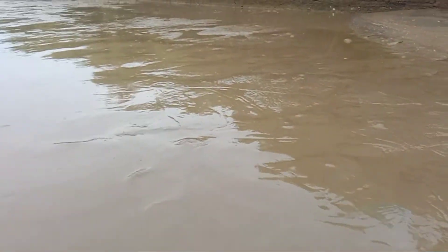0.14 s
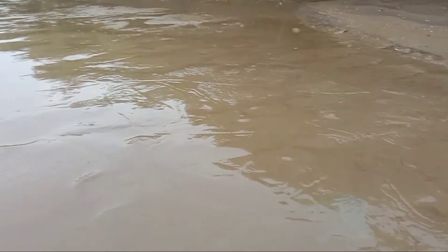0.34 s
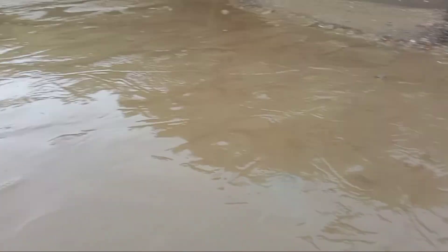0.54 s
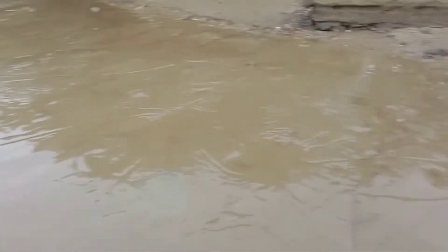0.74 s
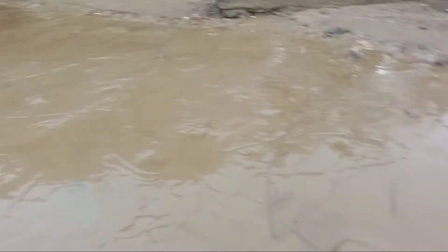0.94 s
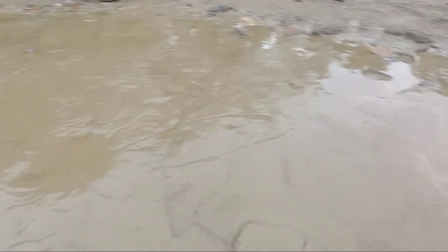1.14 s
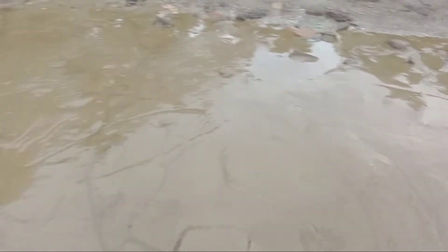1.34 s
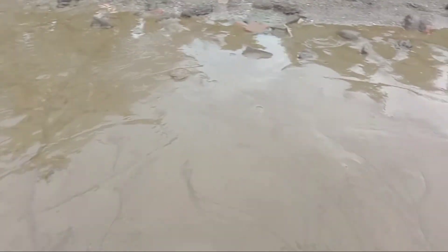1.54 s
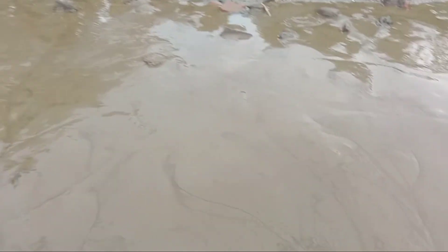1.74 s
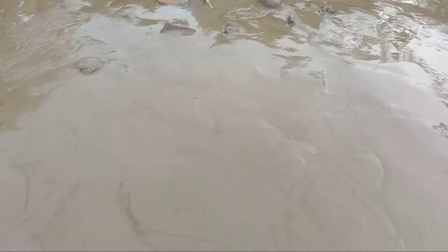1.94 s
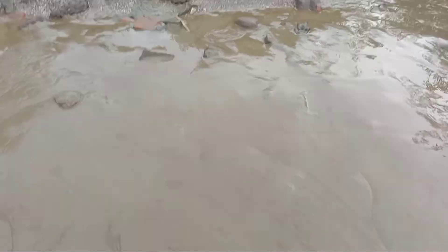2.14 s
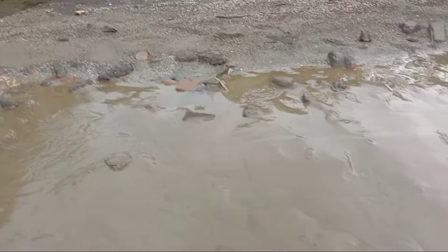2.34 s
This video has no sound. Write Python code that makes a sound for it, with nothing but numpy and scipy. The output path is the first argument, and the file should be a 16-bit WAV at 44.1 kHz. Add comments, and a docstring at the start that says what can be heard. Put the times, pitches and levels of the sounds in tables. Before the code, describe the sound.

A foot squelches and splashes through shallow muddy water while low wind thumps the microphone

```python
"""Wind buffets the microphone while a foot wades through shallow water on tidal mud.
The stride churns up a cloud of ringing bubbles and a fine ticking spray, and drops plop back.
The foot presses into the mud: sliding tones gurgle and short noise cracks snap. Ripples chirp softly.
The wind is low filtered noise with short thumps. Faint tones and soft air noise lie behind it all."""
import sys
import numpy as np
from scipy import signal
from scipy.fft import rfft, irfft
from scipy.io import wavfile

SR = 44100
rng = np.random.default_rng(int(sys.argv[2]) if len(sys.argv) > 2 else 0)


def wav_out(sig):
    """Save sig, one row per channel (or a flat mono array), as 16-bit PCM at SR to the path in sys.argv[1]."""
    wavfile.write(sys.argv[1], SR, np.round(np.clip(np.atleast_2d(sig).T, -1, 1) * 32767).astype(np.int16))


N = 110250  # samples, 2.5 s


def amp(db):
    """Turns decibels into gain."""
    return 10 ** (np.asarray(db) / 20)


def unit(x):
    """Scales a sound to an rms of one."""
    return x / np.sqrt(np.mean(x ** 2) + 1e-20)


def curve(points):
    """Joins (t, value) points with straight lines, one value per sample."""
    return np.interp(np.arange(N) / SR, *np.transpose(points))


def read(points, hz):
    """Reads a spectrum in dB at any frequency, along a log-frequency axis."""
    f, db = np.transpose(points)
    return np.interp(np.log(hz + 1), np.log(f + 1), db)


def colour(x, points):
    """Filters a sound to a spectrum, with no sound before its cause (minimum phase)."""
    size = 4096
    log_gain = np.log(amp(read(points, abs(np.fft.fftfreq(size, 1 / SR)))))
    response = np.exp(np.conj(signal.hilbert(log_gain)))
    taps = np.fft.ifft(response).real
    return signal.fftconvolve(x, taps[:size // 2])[:len(x)]


def noise(points):
    """Makes steady noise with the given spectrum and an rms of one."""
    gain = amp(read(points, np.fft.rfftfreq(N, 1 / SR)))
    return unit(irfft(rfft(rng.standard_normal(N)) * gain, N))


def steadied(x, span_s):
    """Holds the short-term level of a random texture close to one."""
    window = np.hanning(int(2 * span_s * SR) + 3)
    power = signal.fftconvolve(x ** 2, window / window.sum(), "same")
    return x / np.sqrt(abs(power) + 1e-9)


def impacts(per_s, spread_db):
    """Scatters random clicks, a few much larger than the rest."""
    out = np.zeros(N)
    at = np.flatnonzero(rng.random(N) < per_s / SR)
    size, sign = rng.random((N // 4, 2))[:len(at)].T
    boost_db = spread_db * np.minimum(-np.log(1 - size), 4)
    out[at] = amp(boost_db) * np.sign(sign - .5)
    return out


def add(mix, s, sound):
    """Mixes a sound in at a time in seconds."""
    at = round(s * SR)
    part = mix[max(at, 0):][:len(sound)]
    part += sound[:len(part)]


GLIDE_SCALE = .022  # scales each pitch's random glide


def bubble_crowd(level, spectrum, per_s, spread_db, cycles, hiss_db):
    """Many small bubbles each ring briefly and mostly rise a little in pitch, over some hiss."""
    out, t = np.zeros(N), np.arange(SR // 20) / SR
    pitches = np.geomspace(500, 8500, 36)  # Hz
    for hz in pitches:
        age = t * hz / (cycles * rng.uniform(1.0, 2.0))  # the ring fades over 1-2 times `cycles`
        glide = GLIDE_SCALE * rng.uniform(-1.4, 2.96) * np.tanh(age / 2) * 2
        pitch = hz * (1 + glide)
        ring = (1 - np.exp(-6 * age)) * np.exp(-age) * np.sin(2 * np.pi * np.cumsum(pitch) / SR)
        rings = signal.oaconvolve(impacts(per_s / len(pitches), spread_db), unit(ring))[:N]
        out += rings * amp(read(spectrum, hz)) * np.sqrt(hz)  # wider-spaced pitches cover more Hz
    texture = unit(out) + amp(hiss_db) * noise(spectrum)
    return steadied(texture, 0.031) * amp(curve(level))


# how loud the churned water is over time: t/s, level/dB
CHURN_LEVEL = [(0, -78), (.3, -70.5), (.62, -70), (.665, -58.5), (.7, -58), (.745, -47.5), (.765, -48.5),
               (.795, -33), (.812, -51.5), (.847, -36.5), (.877, -42), (.92, -43.5), (.948, -49.5),
               (.975, -42.5), (1.015, -41), (1.06, -60), (1.08, -47.5), (1.11, -43.5), (1.165, -46.5),
               (1.2, -56.5), (1.29, -71.5), (1.4, -75), (1.53, -67), (1.62, -75.5), (1.78, -70),
               (1.835, -51), (1.848, -47), (1.885, -57.5), (2.0, -61), (2.13, -68.5), (2.22, -55),
               (2.25, -73), (2.29, -56.5), (2.34, -58), (2.41, -59.5), (2.5, -55)]
# balance of pitches in the churned water: f/Hz, level/dB per Hz (relative)
CHURN_SPECTRUM = [(300, -17.5), (600, -14), (1000, -1), (1700, 1.5), (2400, -5.5), (3200, -16.5),
                  (4300, -16.5), (5500, -35), (7500, -40), (9000, -52)]


def churn():
    """The foot churns the water into a cloud of ringing bubbles with foam hiss."""
    return bubble_crowd(CHURN_LEVEL, CHURN_SPECTRUM, per_s=2000, spread_db=4.9, cycles=5.94, hiss_db=-14.5)


BUBBLE_TRIM_DB = -2.54  # added to every bubble's level
RISE_SHAPE, FALL_SHAPE = 2.2, 1.15  # exponents: higher gives a flatter top and a steeper side
GLIDE_S = .012  # a bubble's glide levels off over this time
# single bubbles and drops: t/s of the peak, f/Hz at the peak, level/dB before the trim,
# rise/s, fall/s, glide/(octaves/s) at the peak
BUBBLE_LIST = [(0.2688, 2216, -39.5, 0.0028, 0.0095, 5), (0.7463, 3760, -31.5, 0.00079, 0.0022, -10),
               (0.757, 1413, -31.5, 0.0062, 0.0012, 9.5), (0.7925, 2070, -27, 0.0018, 0.00081, 14),
               (0.7992, 1324, -27, 0.0091, 0.0063, 30), (0.8187, 2360, -35.5, 0.0013, 0.0056, 12.5),
               (0.8297, 1639, -31, 0.0033, 0.007, 33.5), (0.8324, 1086, -33.5, 0.006, 0.0034, -2),
               (0.8397, 4320, -36, 0.00094, 0.0023, 0.5), (0.8636, 1810, -35.5, 0.012, 0.0024, 29.5),
               (0.887, 1870, -37, 0.002, 0.0079, -7), (0.9207, 2030, -27.5, 0.0012, 0.0039, -14.5),
               (0.9301, 766, -26, 0.0047, 0.0086, 18.5), (0.9826, 1413, -33.5, 0.0094, 0.0028, 12.5),
               (1.0144, 1924, -36.5, 0.0011, 0.0043, 26), (1.019, 3294, -30.5, 0.00049, 0.0013, 5),
               (1.0241, 4100, -33.5, 0.0012, 0.0016, 120.5), (1.0788, 3090, -39, 0.0066, 0.0029, 9.5),
               (1.105, 1208, -33, 0.0013, 0.011, 16), (1.1102, 1732, -33.5, 0.0056, 0.0027, 24),
               (1.163, 2130, -31, 0.00098, 0.0014, 8), (1.1825, 3290, -32.5, 0.0014, 0.0017, 32),
               (1.2381, 4630, -27.5, 0.00028, 0.0016, 10), (1.3192, 2403, -31, 0.0025, 0.0051, 54.5),
               (1.319, 1810, -39.5, 0.002, 0.0058, -13.5), (1.4377, 1096, -17.5, 0.0043, 0.0019, -7.5),
               (1.7544, 2143, -36.5, 0.0016, 0.003, -11), (1.793, 1332, -30.5, 0.0034, 0.0076, 10),
               (1.825, 2690, -37, 0.0032, 0.0037, -12), (1.8433, 3610, -34, 0.0012, 0.0015, 60),
               (1.847, 1116, -25.5, 0.0026, 0.00053, 59), (1.861, 3500, -41, 0.0009, 0.0017, 35),
               (1.8626, 1286, -29, 0.001, 0.0032, 3), (1.8816, 2780, -36, 0.0021, 0.0024, 8.5),
               (1.9013, 677, -26.5, 0.0017, 0.001, 40), (1.9365, 1760, -48.5, 0.0089, 0.011, 3.5),
               (1.9637, 1132, -34, 0.0034, 0.0016, 17), (2.0686, 808, -39.5, 0.0029, 0.013, 0.5),
               (2.0821, 3750, -48, 0.0013, 0.0062, 1), (2.1495, 3310, -36, 0.00045, 0.0019, 50.5),
               (2.1542, 2527, -20.5, 0.0011, 0.0013, -5), (2.2102, 2126, -37.5, 0.0017, 0.0028, 81.5),
               (2.2719, 1930, -42, 0.0027, 0.0045, -11.5), (2.2828, 3046, -33.5, 0.00033, 0.003, -2),
               (2.2851, 719, -37, 0.0021, 0.01, -9.5), (2.4432, 1520, -33.5, 0.0031, 0.0026, -11.5)]


def bubbles():
    """Each bubble swells, rings for a few milliseconds and glides in pitch as it nears the surface."""
    out, t = np.zeros(N), np.arange(-SR // 32, SR // 16) / SR  # t = 0 is the peak
    for s, hz, db, rise, fall, glide in BUBBLE_LIST:
        swell, fade = abs(t / rise) ** RISE_SHAPE, abs(t / fall) ** FALL_SHAPE
        shape = np.exp(-np.where(t < 0, swell, fade))
        pitch = hz * 2 ** (glide * GLIDE_S * np.tanh(t / GLIDE_S))
        tone = np.sin(2 * np.pi * (np.cumsum(pitch) / SR + rng.random()))
        add(out, s + t[0], amp(db + BUBBLE_TRIM_DB) * shape * tone)
    return out


FADE_IN_S, FLUTTER_HZ = 0.0021, 173  # edge of each tone, cutoff of its flutter


def sliding_tones(tones):
    """Narrow tones slide in pitch; roughness swaps a pure tone for a randomly fluttering one."""
    out = np.zeros(N)
    low_pass = signal.butter(2, FLUTTER_HZ, fs=SR, output="sos")
    for s, length, first_hz, last_hz, first_db, last_db, rough in tones:
        t = np.arange(0, length, 1 / SR)
        u, rough = t / length, np.clip(rough, 0, 1)
        flutter = signal.sosfilt(low_pass, rng.standard_normal((2, SR // 2)))[:, -len(t):]
        wobble = unit(flutter[0]) + 1j * unit(flutter[1])
        ring = np.sqrt(1 - rough) + np.sqrt(rough / 2) * wobble
        pitch = first_hz * (last_hz / first_hz) ** u
        tone = unit((ring * np.exp(2j * np.pi * np.cumsum(pitch) / SR)).imag)
        edges = np.clip(np.minimum(t, (length - t) / 2) / FADE_IN_S, 0, 1)  # fades out twice as slowly
        add(out, s, tone * amp(first_db + (last_db - first_db) * u) * edges)
    return out


# sliding tones: gurgles, small rising chirps of lapping ripples, one thin rising whistle:
# start t/s, length t/s, first f/Hz, last f/Hz, first level/dB, last level/dB, roughness (0-1)
GURGLE_LIST = [(.038, 0.032, 1410, 2100, -64.5, -65, 0.4), (.355, .04, 1485, 2590, -64.5, -67, 0.77),
               (.458, 0.042, 1602, 2770, -70.5, -65.5, .6), (.545, .04, 1900, 2610, -63.5, -63.5, 0.7),
               (0.669, 0.051, 1880, 1990, -44, -53.5, 0.54), (.762, 0.065, 705, 807, -38, -58.5, 0.23),
               (.852, 0.031, 738, 800, -43.5, -57, 0.45), (.895, 0.027, 503, 584, -39.5, -32.5, 0.34),
               (.897, 0.026, 823, 960, -36.5, -49, 0.88), (.94, .04, 664, 730, -45, -37.5, 0.4),
               (0.953, 0.061, 891, 1495, -45, -43, 0.6), (1.44, 0.045, 1108, 1070, -53, -65.5, 0.84),
               (1.836, 0.032, 572, 790, -37.5, -45, 0.86), (1.849, .018, 5200, 7600, -59.5, -50, .7),
               (1.886, 0.037, 585, 787, -44, -48, 0.42), (2.187, 0.047, 478, 647, -35.5, -43.5, 0.01),
               (2.28, 0.039, 930, 980, -49.5, -54.5, 0.4), (2.291, 0.068, 482, 531, -57, -52.5, 0.38),
               (2.357, 0.044, 715, 1310, -47.5, -45, 0.28), (2.409, 0.092, 438, 814, -42, -37.5, 0.09),
               (2.41, 0.015, 612, 780, -62, -41, 0.77), (2.412, 0.092, 642, 1283, -42.5, -45.5, 0.77),
               (2.453, 0.045, 1146, 1733, -38.5, -51, .5)]


def gurgles():
    """Gurgles, ripple chirps and a thin whistle: narrow tones, some fluttering, mostly slide upward."""
    return sliding_tones(GURGLE_LIST)


SNAP_RISE_S, SNAP_DECAY_S, FIZZ_DECAY_S = .0005, 0.00087, 0.00042
RING_DB, RING_HZ, RING_S = -11, 4643, .0009  # level against the crack, middle pitch, time to peak
# bursting films of mud and water: t/s, level/dB, share of thin fizz (0-1)
SNAP_LIST = [(0.035, -46.5, 0), (0.122, -46.5, 0.07), (.44, -47.5, 0), (0.7063, -34, 0), (.7635, -29, 0.11),
             (.7855, -38, .05), (0.855, -52, .2), (0.867, -34, 0.23), (0.9418, -37, 1),
             (0.9568, -26.5, 0.02), (0.9706, -29.5, 0.3), (1.007, -31.5, 0), (1.0138, -21.5, 0.84),
             (1.06, -33.5, 0.76), (1.1117, -26.5, 0.07), (1.1388, -23, 0.03), (1.15, -50, 0.7),
             (1.1635, -33, 0.9), (1.173, -30, 0.7), (1.204, -40, 0.54), (1.2325, -32.5, 0.7),
             (1.238, -32, 0.48), (1.4217, -50, 0.15), (1.432, -43, .05), (1.445, -48.5, .05),
             (1.8422, -31, 0.04), (1.8454, -30, .06), (1.856, -32, 0.2), (1.8631, -28, 0),
             (1.8792, -37, 0.05), (1.936, -39.5, 0.25), (2.066, -49, 0.3), (2.19, -36, 0.6),
             (2.225, -31, 0.44), (2.281, -37, 0.13), (2.396, -44.5, .2), (2.423, -42, 0.4)]
# balance of pitches in the crack: f/Hz, level/dB per Hz (relative)
CRACK_SPECTRUM = [(400, -1.5), (1200, -4.5), (2500, 4.5), (4200, -10.5), (5600, -15.5), (7600, -10),
                  (9400, -38.5), (16000, -1)]
# balance of pitches in the thin fizz: f/Hz, level/dB per Hz (relative)
FIZZ_SPECTRUM = [(5000, -11), (9500, -34), (12500, 6.5), (15000, 9), (16500, 3)]


def snaps():
    """Films of mud and water burst with a short crack, a tiny ring and a thin fizz."""
    out, t = np.zeros(N), np.arange(SR // 50) / SR
    for s, db, thin in SNAP_LIST:
        a, b = rng.standard_normal((2, len(t))) * (1 - np.exp(-t / SNAP_RISE_S))
        crack = colour(a * np.exp(-t / SNAP_DECAY_S), CRACK_SPECTRUM)
        fizz = colour(b * np.exp(-t / FIZZ_DECAY_S), FIZZ_SPECTRUM)
        age = t / RING_S
        hz = RING_HZ * 2 ** rng.uniform(-.5, 0.56)
        ring = age * np.exp(1 - age) * np.sin(2 * np.pi * hz * t * (1 + 0.0094 * age))  # pitch rises
        crack = crack / abs(crack).max() + amp(RING_DB) * ring
        thin = np.clip(thin, 0, 1)
        snap = (1 - thin) * crack / abs(crack).max() + thin * fizz / abs(fizz).max()
        add(out, s, amp(db) * snap)
    return out


# how loud the pattering drops are over time: t/s, level/dB
PATTER_LEVEL = [(0, -76), (.035, -60.5), (.09, -69.5), (.125, -62.5), (.28, -63.5), (.33, -70),
                (.38, -65.5), (.52, -77), (.66, -69), (.72, -55.5), (.77, -55), (.81, -86), (.86, -46.5),
                (.93, -81), (.97, -57.5), (1.015, -56), (1.05, -63.5), (1.12, -54.5), (1.2, -63.5),
                (1.3, -67), (1.4, -72), (1.44, -60), (1.48, -68.5), (1.53, -59.5), (1.62, -87),
                (1.79, -76.5), (1.855, -59), (1.9, -65), (1.97, -65.5), (2.02, -92), (2.07, -62.5),
                (2.13, -70), (2.2, -56), (2.25, -67.5), (2.29, -65.5), (2.36, -71.5), (2.42, -62.5),
                (2.5, -84)]
# balance of pitches in the patter: f/Hz, level/dB per Hz (relative)
PATTER_SPECTRUM = [(1200, -25), (2200, -1.5), (3000, 6), (3900, 2.5), (4700, -10.5), (5800, -15),
                   (7400, -3), (8300, -20.5), (9400, -37.5)]


def patter():
    """Small drops patter back and trickle, ringing as many small bubbles over a hiss."""
    return bubble_crowd(PATTER_LEVEL, PATTER_SPECTRUM, per_s=2200, spread_db=3.76, cycles=9, hiss_db=-6.5)


# how loud the fine spray is over time: t/s, level/dB
SPRAY_LEVEL = [(0, -83), (.06, -68.5), (.12, -92), (.66, -95), (.73, -70), (.78, -76), (.81, -81),
               (.85, -59), (.92, -72.5), (.98, -64.5), (1.08, -63.5), (1.16, -52.5), (1.27, -58),
               (1.38, -77), (1.44, -79.5), (1.54, -71), (1.6, -95), (1.8, -83), (1.87, -74), (1.9, -88),
               (2.1, -82.5), (2.2, -68), (2.26, -92), (2.3, -68), (2.5, -87)]
# balance of pitches in the spray: f/Hz, level/dB per Hz (relative)
SPRAY_SPECTRUM = [(3000, -26), (4600, -18), (7700, -9.5), (9400, -19), (11000, -10.5), (12500, -2),
                  (15000, 7), (16300, -12)]


def spray():
    """Tiny droplets tick on the surface as filtered clicks, with a mist of noise."""
    ticks = unit(colour(impacts(per_s=4000, spread_db=14), SPRAY_SPECTRUM))
    mist = amp(-4.5) * noise(SPRAY_SPECTRUM)
    return steadied(ticks + mist, .04) * amp(curve(SPRAY_LEVEL))


def bank(x):
    """The muddy bank scatters sound back as sparse random echoes that die away quickly."""
    delay_s, t60_s = 0.0038, 0.12  # silence before the echoes, time to fall by 60 dB
    t = np.arange(SR // 2) / SR
    sparse = rng.standard_normal(len(t)) * (rng.random(len(t)) < .1)
    taps = sparse * (t > delay_s) * amp(-60 * t / t60_s)
    return signal.fftconvolve(x, taps / np.linalg.norm(taps))[:N]


LULL_DB, GUST_DB = -30.5, -24.5  # wind levels where the sound is all lull or all gust
THUMP_CYCLES = 0.69  # half-width of a thump, in cycles of its pitch
RASP_DB, RASP_S = -37, 0.01  # rasp level against its thump, half-width
# how loud the turbulence is over time: t/s, level/dB
WIND_LEVEL = [(0, -55.5), (.05, -48.5), (.09, -60), (.115, -41), (.18, -41), (.25, -30), (.33, -26.5),
              (.5, -24), (.62, -27), (.69, -23), (.72, -30.5), (.78, -21), (.82, -31.5), (.88, -30),
              (.92, -17.5), (1.05, -25.5), (1.085, -31.5), (1.125, -43), (1.16, -28.5), (1.2, -43.5),
              (1.25, -39.5), (1.305, -26), (1.335, -54), (1.46, -49), (1.52, -59.5), (1.63, -48.5),
              (1.7, -61), (1.78, -45.5), (1.82, -55.5), (1.865, -36.5), (1.92, -53.5), (1.98, -48.5),
              (2.03, -35), (2.135, -37), (2.17, -62), (2.5, -59)]
# balance of pitches in weak wind: f/Hz, level/dB per Hz (relative)
LULL_SPECTRUM = [(20, -34), (45, -20.5), (70, -3.5), (108, 3), (150, -5.5), (240, -16), (320, -33),
                 (500, -53), (900, -84.5)]
# balance of pitches in strong wind: f/Hz, level/dB per Hz (relative)
GUST_SPECTRUM = [(20, -37), (40, -27), (70, -4), (114, 1), (190, -2.5), (260, -6.5), (350, -17.5),
                 (480, -32), (700, -58), (1100, -85)]
# single eddies hitting the microphone: t/s of the middle, level/dB before shaping, f/Hz
EDDIES = [(0.255, -17.5, 171), (0.334, -16.5, 187), (0.4147, -13.5, 165), (0.4434, -10, 160),
          (.465, -18.5, 185.5), (0.5, -14, 211), (0.52, -10.5, 204), (.597, -14, 206), (0.6937, -20.5, 126),
          (0.7373, -10, 139.6), (0.7724, -24, 191), (0.9297, -14.5, 141), (0.9679, -15.5, 120),
          (1.0389, -11, 113), (1.0668, -14, 204), (1.1414, -21, 129), (1.2882, -19, 173),
          (1.7503, -27, 120), (2.03, -26, 132), (2.1013, -28.5, 95)]
# balance of pitches in the rasp on each eddy: f/Hz, level/dB per Hz (relative)
RASP_SPECTRUM = [(150, -30), (330, 8.5), (520, 0), (800, -18), (1300, -36), (2500, -69.5)]


def wind():
    """Low turbulence brightens in the gust, with single eddies thumping and rasping through it."""
    level_db = curve(WIND_LEVEL)
    gust = np.clip((level_db - LULL_DB) / (GUST_DB - LULL_DB), 0, 1)
    turbulence = np.sqrt(1 - gust) * noise(LULL_SPECTRUM) + np.sqrt(gust) * noise(GUST_SPECTRUM)
    out = steadied(turbulence, 0.035) * amp(level_db)
    t, rasp_level = np.arange(-SR // 40, SR // 40) / SR, np.zeros(N)
    for s, db, hz in EDDIES:
        thump = -np.sin(2 * np.pi * hz * t) * np.exp(-(hz * t / THUMP_CYCLES) ** 2)
        add(out, s + t[0], amp(db) * thump)
        add(rasp_level, s + t[0], amp(db + RASP_DB) * np.exp(-(t / RASP_S) ** 2))
    return out + rasp_level * noise(RASP_SPECTRUM)


# faint narrow tones: start t/s, length t/s, first f/Hz, last f/Hz,
# first level/dB, last level/dB, roughness (0-1)
FAINT_TONE_LIST = [(1.32, 0.17, 243, 247, -61, -52.5, 0.01), (1.66, .11, 310, 210, -67, -56.5, .03),
                   (1.565, 0.089, 7500, 7300, -68.5, -75, 0.3), (2.09, .05, 7600, 7500, -79, -63, .5)]


def faint_tones():
    """A few faint narrow tones in the background; most hold nearly steady, one low tone falls clearly."""
    return sliding_tones(FAINT_TONE_LIST)


# balance of pitches in the distant air: f/Hz, level/dB per Hz (relative)
AIR_SPECTRUM = [(30, -1), (150, 4.5), (400, -9), (900, -28.5), (2000, -12), (3200, -19), (5200, -38),
                (7400, -17), (9500, -35.5), (13000, -38.5), (16000, -30)]


def air():
    """Distant air is a soft, steady noise."""
    return amp(-72) * noise(AIR_SPECTRUM)


def scene():
    """Adds the water and mud sounds, their scatter, the wind, the faint tones and the air."""
    water = churn() + bubbles() + gurgles() + snaps() + patter() + spray()
    scatter = amp(-16.5) * bank(water)
    mix = water + scatter + wind() + faint_tones() + air()
    return mix[None]  # one channel


def record(dry):
    """The recorder's band limit: a low-pass filter removes the highest treble."""
    taps = signal.firwin(511, 16050, window=("kaiser", 9), fs=SR)  # cutoff in Hz
    return signal.oaconvolve(dry, taps[None], "same")


dry = scene()
out = record(dry)
wav_out(out)
```